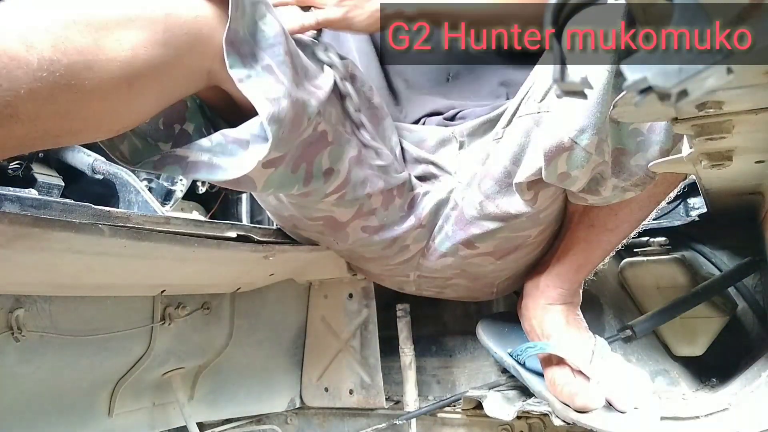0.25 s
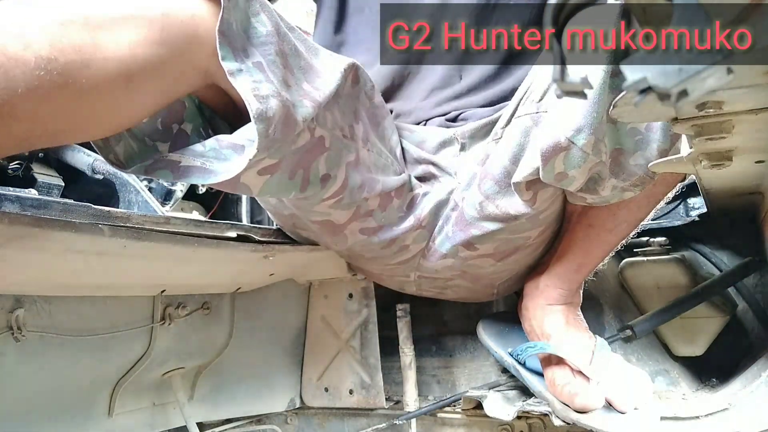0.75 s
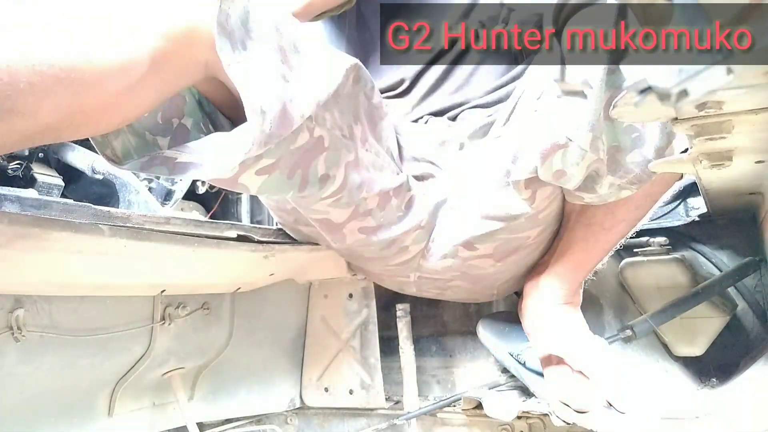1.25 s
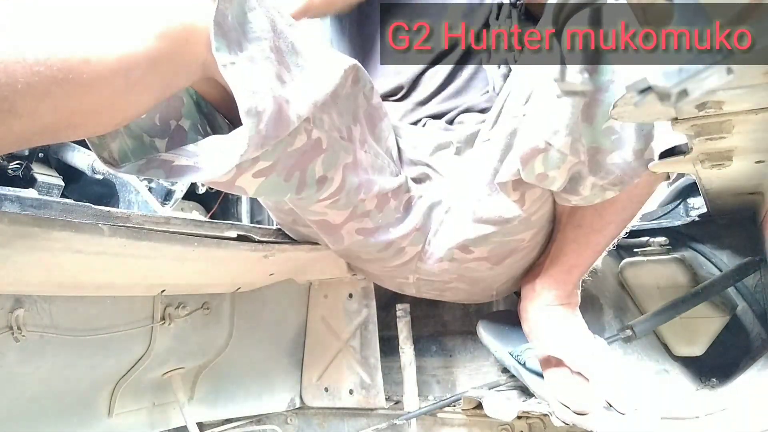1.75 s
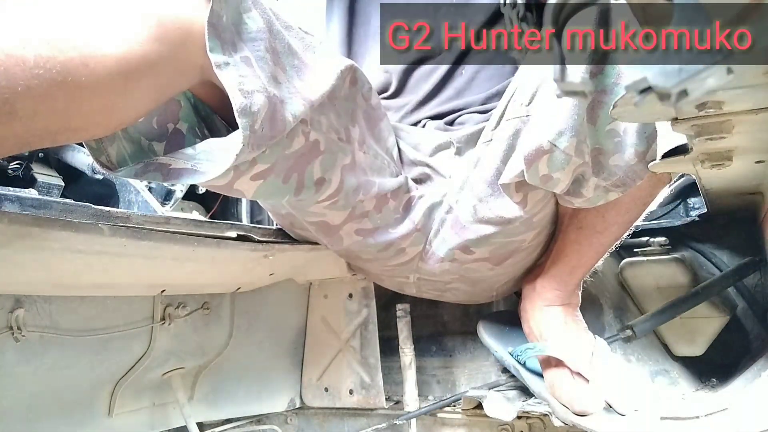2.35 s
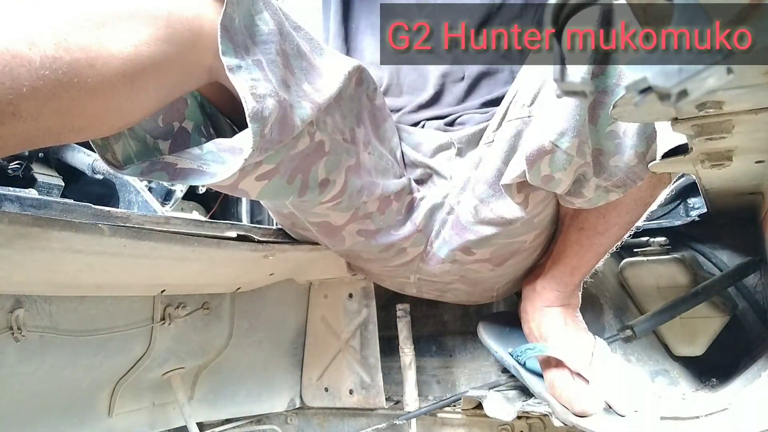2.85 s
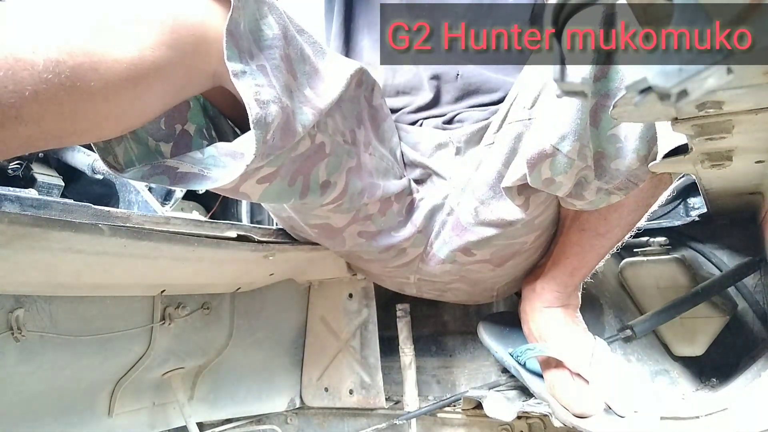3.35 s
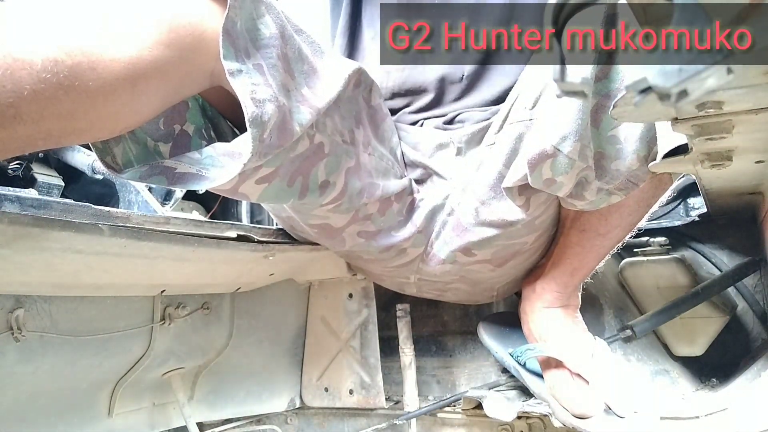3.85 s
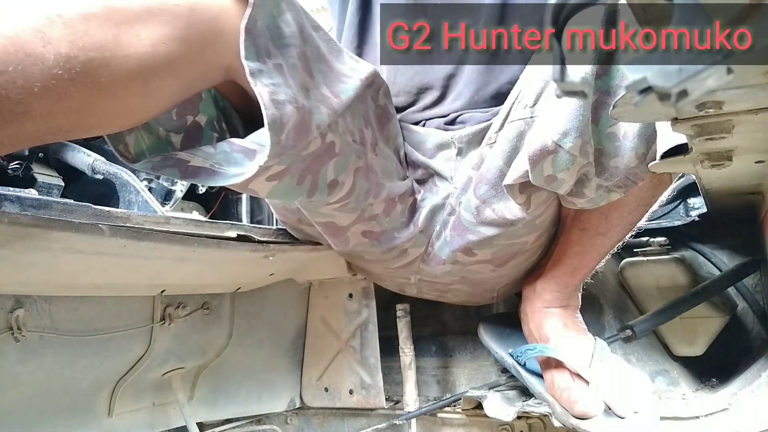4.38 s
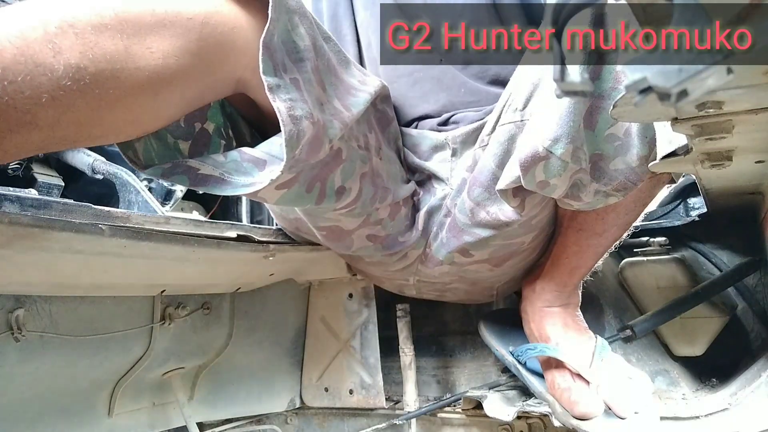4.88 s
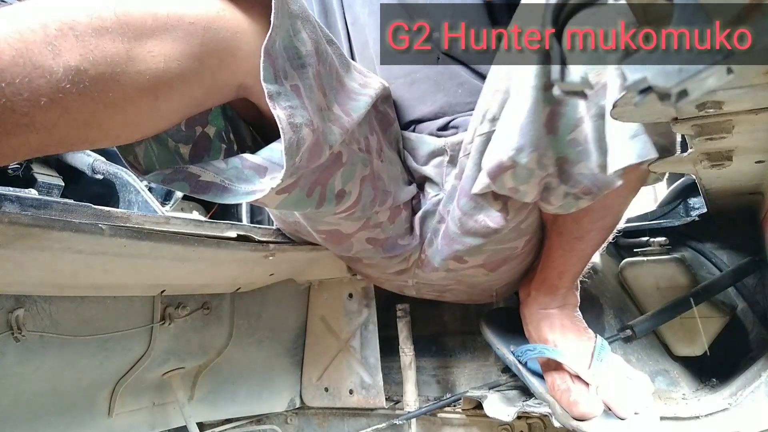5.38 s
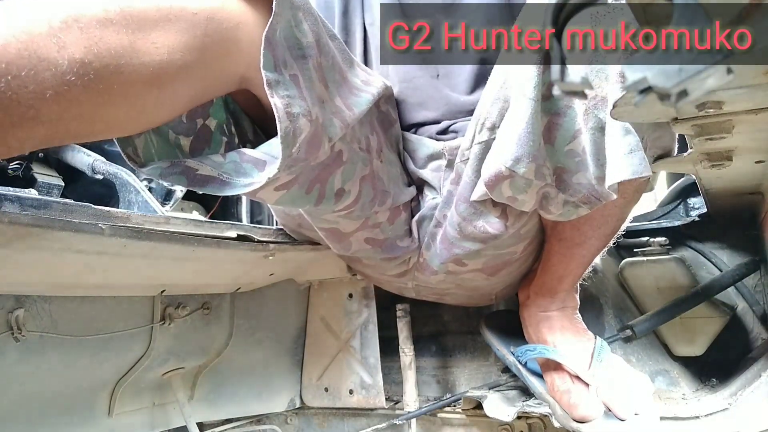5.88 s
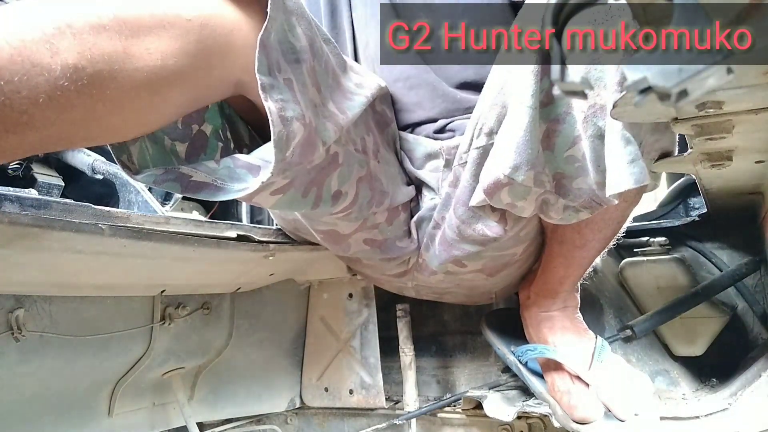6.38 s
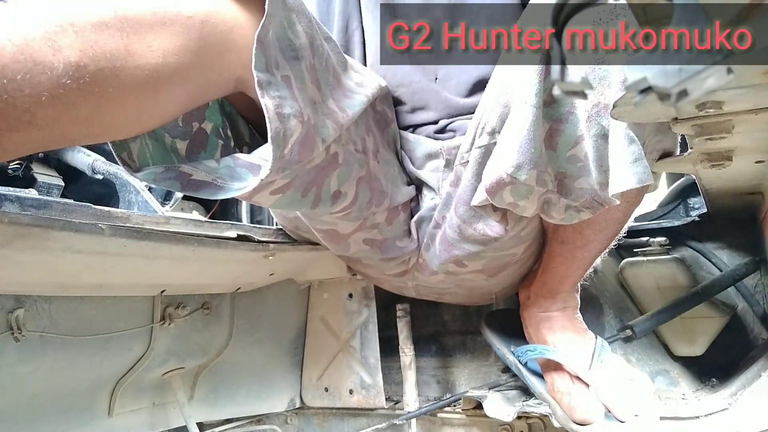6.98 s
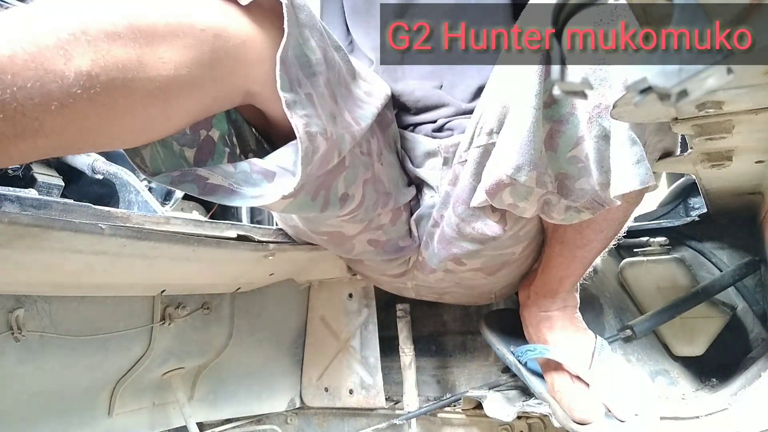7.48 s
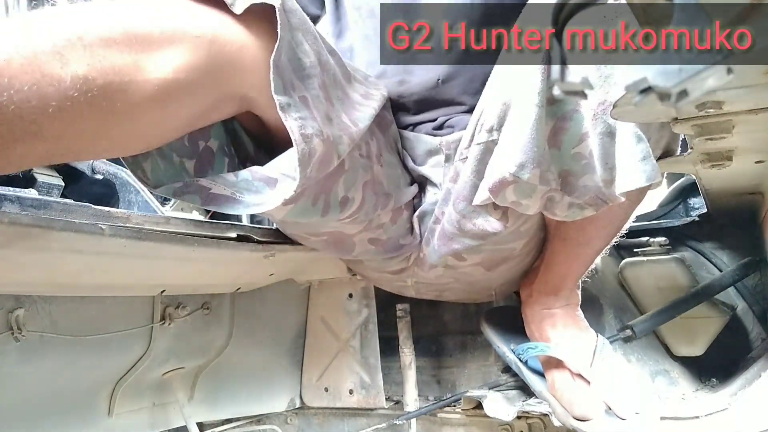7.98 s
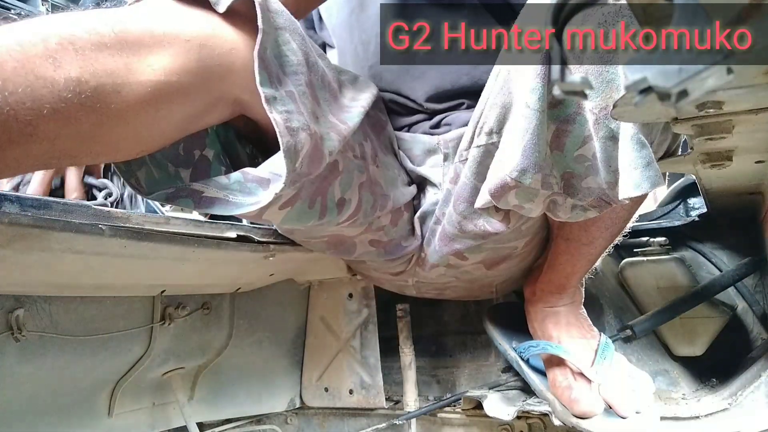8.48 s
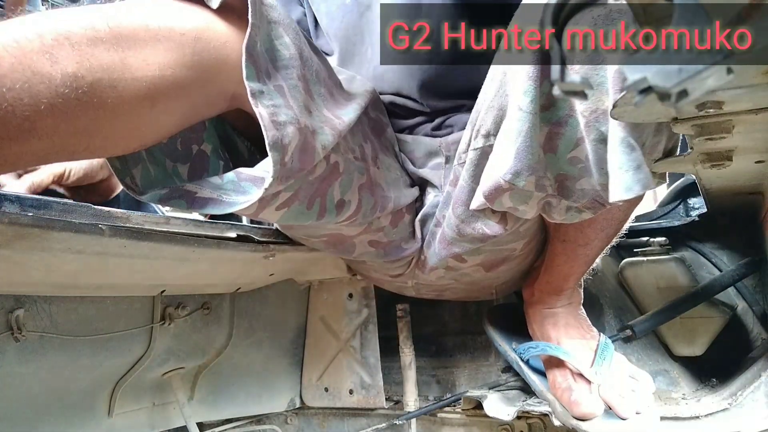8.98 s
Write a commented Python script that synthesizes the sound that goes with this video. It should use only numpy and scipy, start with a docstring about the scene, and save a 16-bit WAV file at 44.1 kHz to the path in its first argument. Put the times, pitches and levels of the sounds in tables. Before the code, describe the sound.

Close chain links rattle and cloth rubs while a far engine hums outdoors, then a steel tool drags and heavy metal thumps down.

```python
"""Someone works with chain and steel tools under a car, close to a phone with two microphone openings.
From the start, air hisses, far traffic rumbles and a distant engine drones, while chain and cloth scrape
and links click and clank. A faint hoot sounds just before 1 s. The drone is loudest at 5-6 s. Near 7.7 s
a dragged steel tool sings. After 8.2 s the drone ducks suddenly under the loudest clanks, as the phone
turns its gain down; heavy steel thumps down, and a small dragged piece rings last."""
import sys
import numpy as np
from scipy import signal
from scipy.fft import rfft, irfft, next_fast_len
from scipy.io import wavfile
from scipy.ndimage import uniform_filter1d

SR = 44100
rng = np.random.default_rng(int(sys.argv[2]) if len(sys.argv) > 2 else 0)


def to_wav(s):
    """Save 16-bit WAV."""
    ch = np.atleast_2d(s).T  # columns
    pcm = np.round(np.clip(ch, -1, 1) * 32767)  # PCM
    wavfile.write(sys.argv[1], SR, pcm.astype(np.int16))


N = 407043
PORT_LAG_S, ALIKE = 0.00025, .4  # a port is a microphone opening; ALIKE: how well near sounds match


def undb(db):
    """Turn decibels into a number to multiply by."""
    return 10 ** (np.asarray(db) / 20)


def unit(x):
    """Scale a signal to an average strength (rms) of 1."""
    return x / np.sqrt(np.mean(x ** 2))


def curves(table):
    """Join a table's points in time with straight lines, one curve per column."""
    times, *columns = np.transpose(table)
    return [np.interp(np.arange(N) / SR, times, column) for column in columns]


def spectrum_db(points, size):
    """Join (frequency, level) points into a level for every frequency of a transform."""
    hz, db = np.transpose(points)
    return np.interp(np.log(np.arange(size // 2 + 1) * SR / size + 1), np.log(hz + 1), db)


def colour(x, points):
    """Turn frequencies up or down, like an equaliser."""
    size = next_fast_len(x.shape[-1])
    return irfft(rfft(x, size) * undb(spectrum_db(points, size)), size)[..., :x.shape[-1]]


def band(x, lo_hz, hi_hz):
    """Keep the sound between two frequencies."""
    return signal.sosfilt(signal.butter(3, [lo_hz, hi_hz], "band", fs=SR, output="sos"), x)


def wander(rate, size=N):
    """A smooth random curve that heads for a new value `rate` times a second."""
    held = np.repeat(rng.standard_normal(int(N / SR * rate) + 2), 8)
    smooth = 1.486 * uniform_filter1d(uniform_filter1d(held, size=8), size=8)
    return np.interp(np.linspace(0, N / SR * rate * 8, size), np.arange(len(held)), smooth)


def port_noise(size, alike, lag_s):
    """Noise at both ports: the right hears a shifted copy of the left, plus its own reflections."""
    direct, reflected = rng.standard_normal((2, size))
    shifted = np.roll(direct, int(lag_s * SR))
    return np.array([direct, alike * shifted + np.sqrt(1 - alike ** 2) * reflected])


def stroke_db(start_s, rise_s, hold_s, rise_db, fall_db_s, sag_db_s=0):
    """The level of one movement: it climbs to 0 dB, holds or sags, then falls steadily."""
    t = np.arange(N) / SR - start_s
    climb = rise_db * np.clip(1 - t / rise_s, 0, 1)
    sag = sag_db_s * np.clip(t - rise_s, 0, hold_s)
    fall = fall_db_s * np.maximum(t - rise_s - hold_s, 0)
    return np.where(t < 0, -200, -climb - sag - fall)


# Tone colour of the outdoor air: (frequency [Hz], relative level [dB])
AIR_COLOUR = [(530, -27), (900, -10), (1090, -8), (1200, 1), (1940, -3), (2080, -7), (2430, 6),
              (4110, -3.5), (6330, -3), (6960, -1.5), (9500, -9), (12500, -28), (15700, -33)]


def air(level_db=-50.5):
    """A faint, steady outdoor hiss."""
    return unit(colour(port_noise(N, 0.16, PORT_LAG_S), AIR_COLOUR)) * undb(level_db)


# Tone colour of far traffic: (frequency [Hz], relative level [dB])
TRAFFIC_COLOUR = [(18, -26), (30, -21), (50, -15), (65, 5), (110, 3), (160, -11), (300, -54)]


def traffic(level_db=-42):
    """Far traffic: a low, gently wavering rumble, the same at both ports."""
    return unit(colour(port_noise(N, 1.0, 0), TRAFFIC_COLOUR)) * undb(level_db + 0.9 * wander(3.4))


# Engine pitch; tone 2 is twice the firing rate, tone 3 three times: (time [s], pitch of tone 2 [Hz])
ENGINE_PITCH = [(0.0, 136.2), (0.13, 128.9), (4.25, 135.6), (6.26, 131.9), (6.35, 129.8), (8.04, 129.9),
                (8.2, 126.9)]
# Tones as heard: they waver through the air; the drop near 8.3 s is the phone turning its gain down:
# (time [s], tone 2 [dB], tone 3 [dB], tone 4 [dB])
ENGINE_TONES = [(0.0, -31.5, -36, -38), (0.36, -25.5, -40.5, -36.5), (1.0, -27.5, -32.5, -37),
                (2.29, -22, -28, -28), (2.49, -19.5, -28, -32.5), (2.57, -29, -27, -29),
                (2.93, -24, -22, -28.5), (3.24, -20, -31.5, -23), (3.47, -26.5, -27.5, -25.5),
                (3.62, -13.5, -25.5, -19.5), (4.01, -15.5, -27.5, -36), (4.09, -12, -23.5, -24.5),
                (4.42, -15, -25, -18.5), (4.55, -18, -28, -28), (4.73, -12, -19.5, -15.5),
                (4.98, -10, -21, -22.5), (5.09, -19.5, -24, -23.5), (5.58, -12.5, -14.5, -16.5),
                (5.63, -12, -19, -33), (5.68, -16.5, -22, -20), (5.91, -15.5, -18.5, -17.5),
                (6.01, -14, -27, -22), (6.09, -23, -21.5, -21.5), (6.5, -10.5, -27, -22.5),
                (7.1, -17, -34, -26.5), (7.2, -24.5, -35, -35), (7.35, -15.5, -31, -30.5),
                (7.79, -23, -36, -33), (7.99, -22, -31, -27.5), (8.35, -35.5, -49, -41.5),
                (8.76, -34, -33, -38), (8.82, -40, -48, -46), (9.23, -39.5, -44, -50.5)]
# Weak extra tones from uneven cylinders: (pitch [times tone 2], level compared with the roar [dB])
CYLINDER_TONES = [(.25, -8.5), (.5, -10), (.625, -19.5), (.75, -23), (.875, -3.5), (1.125, 1.5), (1.25, -4),
                  (1.375, -13.5), (1.625, 1), (1.75, -2.5), (1.875, -0.5), (2.125, 2), (2.25, -16),
                  (2.75, -3), (3, -24), (3.5, -5.5), (4, -23)]
# The roar as heard, with the same drop in the phone's gain written in: (time [s], level [dB])
ROAR_LEVEL = [(0.0, -42.5), (0.51, -43.5), (0.92, -44.5), (1.31, -44.5), (2.21, -40.5), (2.75, -35.5),
              (3.96, -35), (5.17, -28.5), (5.42, -29.5), (6.01, -28.5), (7.45, -35.5), (7.99, -35),
              (8.23, -36.5), (8.3, -48.5), (9.23, -45.5)]
# Tone colour of that roar: (frequency [Hz], relative level [dB])
ROAR_SPECTRUM = [(15, -48), (30, -32), (50, -42), (100, -28), (250, -15), (370, -15.5), (410, -27),
                 (520, -20.5), (800, -23), (950, -34), (3000, -41.5), (6000, -69.5)]


def engine(tone_boost_db=3):
    """Firing cylinders make a stack of low tones; exhaust and air add a broad roar."""
    step = 16  # low tones need only every 16th sample
    opposite = np.array([[1], [-1]])  # plus on the left, minus on the right
    roar_db, = curves(ROAR_LEVEL)
    coarse_roar_db = roar_db[::step]
    hz = curves(ENGINE_PITCH)[0][::step]
    second_db, *upper_db = np.array(curves(ENGINE_TONES))[:, ::step] + tone_boost_db
    upper_db.append(coarse_roar_db - 1)  # tone 5 follows the roar
    size = len(hz)
    levels_db = [second_db] + [db + .8 * wander(4, size) for db in upper_db]
    turns = np.cumsum(hz * (1 + 0.0025 * wander(15, size))) * step / SR
    tones = [(1 + k / 2, db + 1.69 * wander(9, size), .4) for k, db in enumerate(levels_db)]
    for multiple, db in CYLINDER_TONES:
        tones.append((multiple, coarse_roar_db + db + 2.92 * wander(6, size), 1.5))
    hum = 0
    for multiple, db, drift_rad in tones:
        apart = .16 * wander(3, size) * opposite  # the ports drift slightly out of step
        phase = 2 * np.pi * multiple * turns + drift_rad * wander(6, size) + apart
        hum = hum + undb(db) * np.sin(phase)
    hum = signal.resample_poly(hum, step, 1, axis=1)[:, :N]
    shared, side = colour(rng.standard_normal((2, N)), ROAR_SPECTRUM)
    # long waves reach both ports alike
    side = colour(side, [(40, -13), (250, -5.5), (500, -13.5), (1000, 1), (16000, -1.5)])
    roar = (shared + side * opposite) / np.std(band(shared, 312, 1350))
    return hum + roar * undb(roar_db + 1.14 * wander(9))


# Scrapes of chain and cloth: (start [s], rise [s], hold [s], middle [dB], lows [dB], highs [dB])
SCRAPE_STROKES = [(0.0, 0.004, 0.045, -31, -49, -37), (0.396, 0.056, 0.04, -48, -61, -53),
                  (1.055, 0.065, 0.22, -38, -66, -35.5), (1.45, 0.048, 0.036, -39.5, -58, -38.5),
                  (1.606, 0.073, 0.13, -50, -60, -49.5), (1.794, 0.071, 0.067, -41.5, -55, -39.5),
                  (1.978, 0.057, 0.25, -46.5, -61, -44.5), (2.32, 0.092, 0.3, -41, -45, -52),
                  (2.822, .1, .16, -28, -34.5, -37.5), (3.292, .1, 0.17, -40.5, -41, -46),
                  (3.994, 0.068, .04, -35.5, -41, -47.5), (4.247, 0.097, .08, -34.5, -58, -42),
                  (4.738, 0.072, .05, -32, -31, -44), (4.945, .1, 0.14, -37, -47, -45.5),
                  (6.407, 0.068, 0.036, -39, -41, -45.5), (6.742, .05, 0.026, -30.5, -39, -40),
                  (7.139, 0.095, .05, -32, -37, -35.5), (7.365, .03, .02, -32.5, -50, -46),
                  (7.657, .02, .03, -29, -48, -27), (7.724, 0.043, .11, -24.5, -31.5, -40),
                  (8.223, 0.036, .02, -18.5, -28, -33), (8.33, 0.044, 0.046, -31, -31, -46),
                  (8.474, 0.066, .05, -23.5, -28, -37), (8.6, .1, 0.052, -14, -19.5, -26),
                  (8.759, 0.029, 0.091, -21, -26.5, -31), (8.993, 0.029, .02, -21.5, -26.5, -43),
                  (9.125, .03, 0.064, -34, -36.5, -42)]
# Tone colour of the rubbing: (frequency [Hz], relative level [dB])
SCRAPE_COLOUR = [(240, -41), (400, -21), (504, -9.5), (578, -12), (798, -10.5), (975, -15.5), (1620, -6.5),
                 (2100, -6), (2600, -9), (3430, -12), (6150, -10), (11900, -23.5), (15700, -34.5)]


def scrapes(slips_per_s=300, slip_tail_s=.004):
    """Chain and cloth rub in many tiny, uneven slips, over a hiss that follows the roar's level."""
    hiss_db = curves(ROAR_LEVEL) + np.array([[-9.5], [-11], [-26]])  # middle, lows, highs
    power = undb(hiss_db) ** 2
    for start_s, rise_s, hold_s, *bands_db in SCRAPE_STROKES:
        swell_db = stroke_db(start_s, rise_s, hold_s, rise_db=14, fall_db_s=167)
        power = power + undb(np.array(bands_db)[:, None] + swell_db) ** 2
    middle, lows, highs = np.sqrt(power)
    slipping = rng.random(N) < slips_per_s / SR
    slips = slipping * undb(np.minimum(3.0 * rng.exponential(size=N), 10.5))
    smeared = signal.lfilter([1], [1, -np.exp(-1 / (slip_tail_s * SR))], slips)
    grain = unit(.75 + unit(smeared))
    noise = colour(port_noise(N, ALIKE, lag_s=-3e-4), SCRAPE_COLOUR)  # reaches the right port first
    return (lows * unit(band(noise, 468, 1254))
            + middle * grain * unit(band(noise, 1630, 6260))
            + highs * grain * unit(band(noise, 7840, 22000)))


# Hits of links and tools, plus light cloth ticks between 1 and 2.1 s; lows, highs and ring are relative, and
# decay is the main crack's 60 dB fall: # (time [s], rough peak [dB], ring pitch [Hz], lows [dB], highs [dB],
# decay [s], ring [dB])
HITS = [(0.0403, -12.5, 4380, -17, -14.5, 0.21, -3), (0.1456, -29, 5780, -16, -15, .045, -6),
        (0.3062, -27.5, 2620, -2, -16, 0.11, -7), (0.398, -32, 1550, 1, -24, .06, -9),
        (0.4559, -29, 6660, -22, -5, 0.13, -7), (0.6379, -24, 2360, -5, -21, 0.067, 8),
        (0.9602, -39, 7000, -19, 2, .05, -14), (0.9944, -38, 7000, -19, -2, .05, -11),
        (1.0355, -27.5, 7060, -19, -4, 0.049, 0), (1.0575, -24, 6300, -20, -4, 0.059, 0),
        (1.1079, -24, 5910, -15, 0, .06, -7), (1.1228, -15.5, 1150, -11, -16, .03, -2),
        (1.1418, -14, 1250, -8, -11, 0.021, -1), (1.487, -24, 6380, -26, -4, .18, -3),
        (1.5289, -18.5, 6200, -36, -10, 0.1, -12), (1.638, -36, 6500, -19, -5, .04, -6),
        (1.68, -33, 6500, -19, -1, .04, -6), (1.7554, -30.5, 6570, -19, -1, .041, -1),
        (1.8073, -30, 5500, -17, -4, .043, -1), (1.9325, -29, 6150, -20, -3, 0.04, -4),
        (2.0324, -28, 6330, -24, -8, .08, -5), (2.12, -34, 6300, -20, -3, .05, -6),
        (2.2692, -21, 6700, -8, 2, .034, -12), (2.4044, -25.5, 5230, -13, -22, .043, -4),
        (2.4402, -26.5, 1520, -8, -8, .08, -14), (2.5983, -27, 2140, 5, -24, .067, -13),
        (2.6994, -19, 1560, 3, -26, 0.055, -10), (2.9023, -12.5, 2900, -9, -18, 0.091, -8),
        (2.9194, -13.5, 6070, -22, -18, 0.043, -7), (2.9672, -16, 6060, -21, -18, 0.16, -16),
        (3.0744, -20.5, 2580, -14, -15, 0.19, -5), (3.1782, -27, 4330, -24, -33, 0.062, 12),
        (3.3837, -20, 2400, 8, -21, 0.16, -6), (3.4945, -24.5, 6030, -11, -15, 0.035, 0),
        (4.0262, -17.5, 2640, -27, -31, 0.062, 3.5), (4.1081, -14.5, 6400, -33, -25, .089, -16),
        (4.5376, -27.5, 3780, 6, -28, .075, 2.5), (4.8065, -8.5, 1550, -11, -21.5, .07, -16),
        (4.9851, -21.5, 6100, -17, -22, 0.062, -2), (5.1248, -19.5, 5770, -20, -17, .096, -4),
        (5.1644, -24, 3800, -4, -24, .055, 6), (5.1814, -15, 4340, -27, -16, 0.041, 0.5),
        (5.2505, -13.5, 1700, 17, -27, 0.14, -14), (5.3263, -22.5, 1630, -11, -12, .053, -4),
        (5.4919, -23.5, 6100, -9, -9, .05, -3), (5.6194, -21.5, 1600, -10, -3, 0.065, -3),
        (6.0671, -20.5, 2330, 4, -33, .061, -11), (6.336, -16.5, 2344, 0, -25, .06, -11),
        (6.5091, -16.5, 4260, -20, -16, .06, 1), (6.7725, -9, 6450, -45.5, -18, 0.1, -3),
        (6.8478, -16, 3950, -13, -23, 0.069, -10), (7.1621, -19, 2010, -3, -15, 0.11, -12),
        (7.2619, -8.5, 1520, -12.5, -21, 0.054, -11), (7.3951, -5.5, 6880, -51, -19, 0.052, 2),
        (7.5602, -21.5, 4590, -10, -23, 0.057, 6.5), (7.6076, -21, 1530, -14, -13, 0.073, -3),
        (7.667, -12, 5900, -21, -2, .1, 1), (7.7564, -8.5, 6450, -12, -15, 0.14, -20),
        (7.8194, -10, 2260, -12, -18, 0.081, 3.5), (7.8594, -13.5, 4430, -8, -27, .079, 0),
        (7.9844, -30, 6500, -9, -6, .06, -6), (8.0144, -28.5, 6500, -10, -5, .05, -6),
        (8.1429, -21, 2340, -8, -26, 0.15, 3.5), (8.1844, -13, 4470, -10.5, -17, 0.079, -14),
        (8.2222, -19, 7050, 7, -22, .066, -8), (8.2427, 2, 1730, -19.5, -22, 0.11, -6),
        (8.2794, -1.5, 1710, -20, -26, 0.081, -8), (8.3094, -6.5, 2770, -1.5, -22, 0.1, -6),
        (8.3709, -5, 2300, -15, -23, .055, -3.5), (8.3994, -15, 1700, -11, -34, 0.1, -0.5),
        (8.4781, -10, 6470, -12, -13, .036, 0), (8.5315, -2.5, 1592, -20, -30, .078, -14),
        (8.5574, -3.5, 2350, 3, -22, .09, -5), (8.5784, -4, 2200, -35, -12, 0.058, -10),
        (8.6313, -4.5, 2150, -6, -33, 0.091, 3), (8.6527, 0.5, 1546, -1, -32, 0.12, -3.5),
        (8.6901, -1.5, 2240, -3, -27, 0.094, -1), (8.7144, -2.5, 6300, -11, -16, 0.14, -13),
        (8.7594, -7, 2642, -9, -14, .09, -5), (8.8694, -10, 2410, -3, -16, 0.055, -2),
        (9.0074, -1, 6505, -15, -18, 0.14, -31), (9.0713, -13.5, 2650, 3, -36, 0.07, -4.5),
        (9.1466, -19.5, 6070, -14, -7, .055, -1)]
# Tone colour of struck metal: (frequency [Hz], relative level [dB])
METAL_COLOUR = [(120, -53), (200, -17), (278, -11), (360, -2.5), (424, -18.5), (558, -5.5), (883, -9),
                (986, -5.5), (2250, -1.5), (3370, -6.5), (6280, -1), (14600, -34), (16000, -23)]


def clanks(tick_count=22, rattle_s=0.0078, ring_width_hz=166):
    """Struck steel rattles and dies away: a crack of many close notes, and one link ringing longer."""
    size = 4096
    out = np.zeros((2, N + size))
    t, hz = np.arange(size) / SR, np.arange(size // 2 + 1) * SR / size
    metal_db = spectrum_db(METAL_COLOUR, size)
    attack = 1 - np.exp(-t / 0.00017)
    soft_end = np.cos(np.pi / 2 * np.arange(size) / size)
    # slack links add faint ticks at random times
    ticks = [(when * N / SR, -32 + 7 * (2 * force - 1), 1500 * 4.5 ** pitch, -14, -11, 0.11, -7)
             for when, force, pitch in rng.random((tick_count, 3))]
    for start_s, peak_db, ring_hz, lows_db, highs_db, decay_s, ring_db in HITS + ticks:
        tilt_db = np.interp(np.log(hz + 1), np.log([400, 1100, 1900, 7000, 9500]),
                            [lows_db + 15.0, lows_db + 16.5, 0, 0, highs_db + 23.5])
        noise = rfft(port_noise(size, ALIKE, PORT_LAG_S))
        notes_db = 3.5 * unit(uniform_filter1d(rng.standard_normal(len(hz)), size=12))  # new each hit
        crack = unit(irfft(noise * undb(metal_db + tilt_db + notes_db)))
        width_hz = ring_width_hz * undb(-0.6 * ring_db)  # a stronger ring is purer
        ring = unit(irfft(noise / (1 + ((hz - ring_hz) / width_hz) ** 2)))
        fade = np.exp(-np.log(1000) * np.maximum(t - rattle_s, 0) / decay_s)
        echo = undb(-14.5) * fade ** .3  # the car body and ground answer briefly
        hit = crack * (fade + echo) + undb(ring_db) * ring * fade ** 0.51
        gain = undb(peak_db - 10.5)  # a crack peaks at about three times its average strength
        start = int(start_s * SR)
        out[:, start:start + size] += gain * hit * attack * soft_end
    return out[:, :N]


def hoot(start_s=.68, end_s=1.1, hz=500, level_db=-42):
    """A faint, steady tone far off."""
    t = np.arange(N) / SR
    swell = np.interp(t, [start_s, start_s + 0.06, end_s - .05, end_s], [0, 1, 1, 0])
    return undb(level_db) * swell * np.sin(2 * np.pi * hz * t)


def drag(notes, start_s, hold_s, gain_db, sag_db_s, decay_s, touch_s=7.757, bumps_per_s=600):
    """Steel slides over steel: tiny bumps set each of its natural notes ringing; the hand damps them."""
    start = int(start_s * SR)
    end = min(start + SR // 2, N)
    size = end - start
    pull_db = stroke_db(start_s, 0.023, hold_s, rise_db=25, fall_db_s=139, sag_db_s=sag_db_s)[start:end]
    lifted = np.arange(start, end) < touch_s * SR  # until the tool's end touches down
    out = np.zeros((2, N))
    for hz, db in notes:
        ring_s, change_db = decay_s, 0
        if hz < 2400:  # low notes swell at the touch; the ground keeps them short
            ring_s, change_db = .4 * decay_s, np.where(lifted, -18, 4)
        elif hz < 4200:  # the touch muffles middle notes
            change_db = np.where(lifted, 4, -8)
        elif hz > 7000:  # the highest notes die faster
            change_db = -52 * np.arange(size) / SR
        bumps = (rng.random(size) < bumps_per_s / SR) * rng.standard_normal(size)
        pole = np.exp(2j * np.pi * hz / SR - np.log(1000) / (ring_s * SR))
        ringing = signal.lfilter([1], [1, -pole], bumps)
        evened = ringing / uniform_filter1d(np.abs(ringing), size=SR // 8)
        port_phase = np.exp(2j * np.pi * rng.random((2, 1)))  # each port meets the wave at its own point
        out[:, start:end] += np.imag(evened * port_phase) * undb(db + gain_db + pull_db + change_db)
    return out


# Natural notes of the long steel tool: (frequency [Hz], relative level [dB])
LONG_TOOL_NOTES = [(1206, -31.5), (1707, -38), (2024, -38), (2175, -33), (2503, -38.5), (3036, -37.5),
                   (3650, -46), (4005, -40.5), (4619, -31), (5270, -57), (5609, -56), (5959, -39),
                   (6250, -41), (6358, -28), (6525, -33), (6912, -29), (7634, -24.5), (8080, -51),
                   (8796, -33), (8974, -51), (9286, -39), (9760, -42), (10471, -56), (11396, -35),
                   (11596, -36), (12274, -38), (13684, -52), (13851, -52), (14309, -52), (15138, -46)]
# Natural notes of the small steel piece: (frequency [Hz], relative level [dB])
SMALL_PIECE_NOTES = [(4016, -40), (4953, -52), (6008, -41), (7660, -38.5), (9028, -49), (10164, -48),
                     (11197, -68), (11983, -66)]


def dragged_tools():
    """The long tool sings as it is dragged; later the small piece does."""
    tool = drag(LONG_TOOL_NOTES, start_s=7.66, hold_s=0.17, gain_db=11.2, sag_db_s=29, decay_s=0.27)
    piece = drag(SMALL_PIECE_NOTES, start_s=9.135, hold_s=0.023, gain_db=12.8, sag_db_s=20, decay_s=0.15)
    return tool + piece


# Heavy steel being set down: (time [s], level [dB], time to fall 60 dB [s])
THUMP_HITS = [(8.32, -30, .15), (8.6, -30, .12), (8.7, -19, 0.22), (8.745, -22.5, 0.18), (9.01, -29, 0.14),
              (9.15, -27.5, 0.17)]
# Tone colour of a thump: (frequency [Hz], relative level [dB])
THUMP_COLOUR = [(30, -15), (80, -2), (200, 0), (370, -2), (600, -9), (1500, -45)]


def thumps():
    """Heavy steel lands with dull, low bursts, the same at both ports."""
    noise = unit(colour(rng.standard_normal(N), THUMP_COLOUR))
    return noise * sum(undb(db + stroke_db(start_s, 0.012, 0, rise_db=15, fall_db_s=60 / decay_s))
                       for start_s, db, decay_s in THUMP_HITS)


# How unevenly the ports hear near sounds: (frequency [Hz], left minus right [dB])
PORT_BALANCE = [(300, 3.5), (700, -1), (1300, 5), (2400, -1.5), (4400, -6), (6500, -9), (8500, 10),
                (12000, 7.5), (15000, 2)]


def scene():
    """Near metal, coloured differently at each port, with the far sounds and air around it."""
    near = scrapes() + clanks() + dragged_tools()
    hz, lean_db = np.transpose(PORT_BALANCE)
    left = colour(near[0], np.c_[hz, lean_db / 2])
    right = colour(near[1], np.c_[hz, -lean_db / 2])
    return np.array([left, right]) + air() + traffic() + thumps() + engine() + hoot()


# The port's own resonance: (frequency [Hz], boost [dB])
PORT_RESONANCE = [(20, 0), (13000, 0), (14500, 8.5), (15200, 6), (15700, 3), (22050, -4)]


def record(dry, top_hz=15700):
    """The port lifts the highest treble; the phone rounds off loud peaks and cuts the very top."""
    bright = colour(dry, PORT_RESONANCE)
    rounded = bright / (1 + bright ** 4) ** .25
    return signal.sosfilt(signal.ellip(10, .2, 90, top_hz, fs=SR, output="sos"), rounded)


dry = scene()
out = record(dry)
to_wav(out)
```